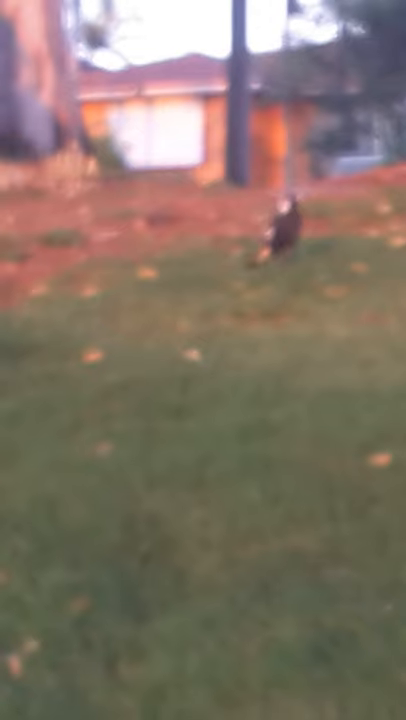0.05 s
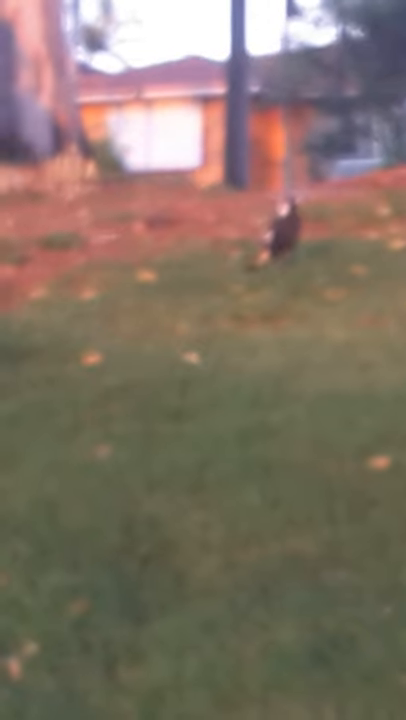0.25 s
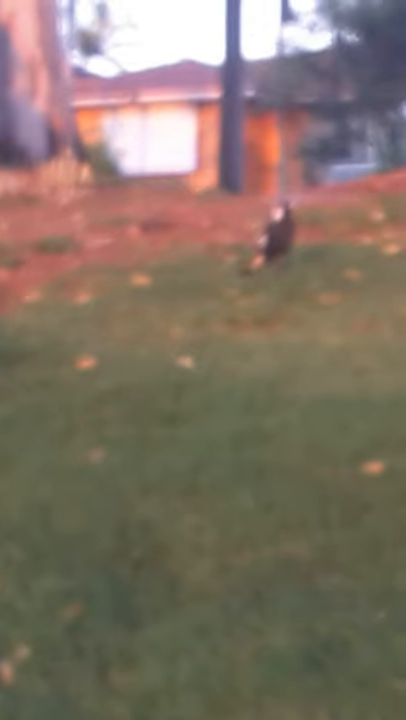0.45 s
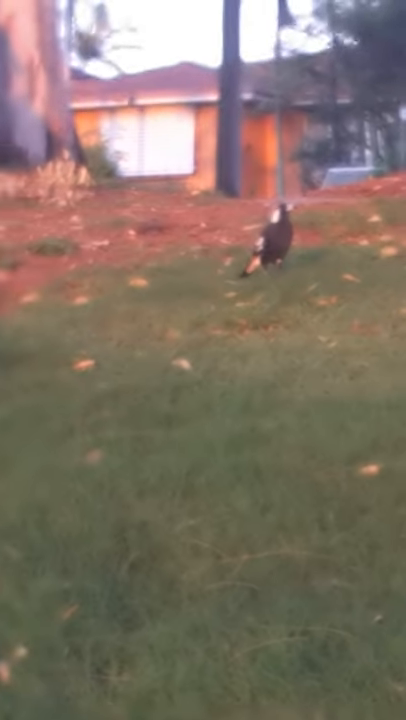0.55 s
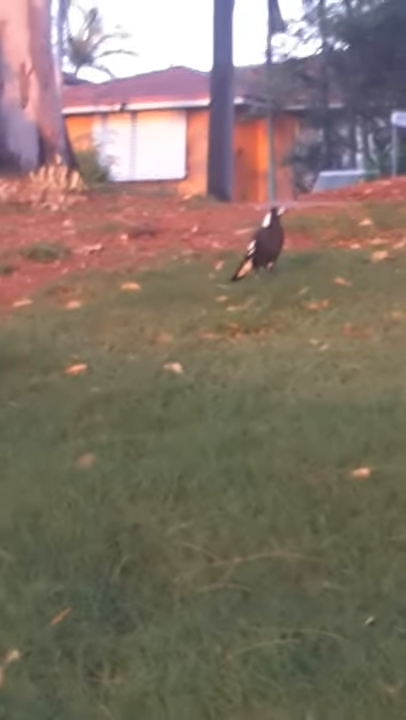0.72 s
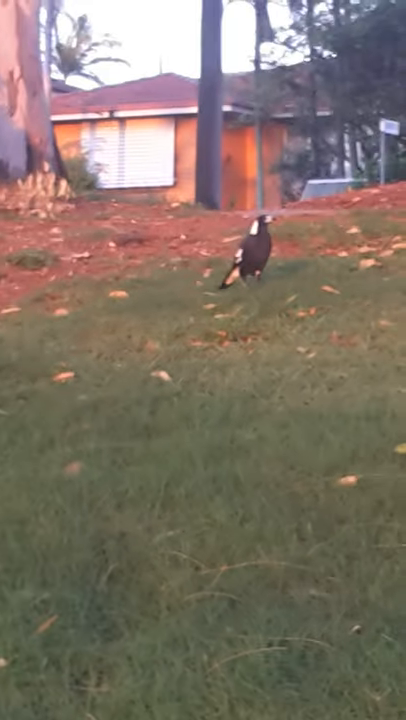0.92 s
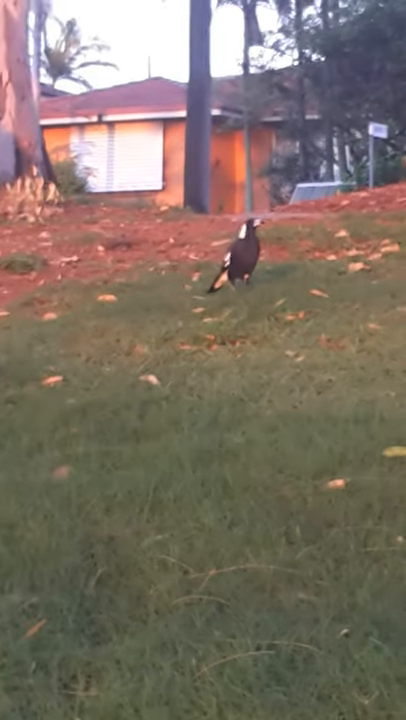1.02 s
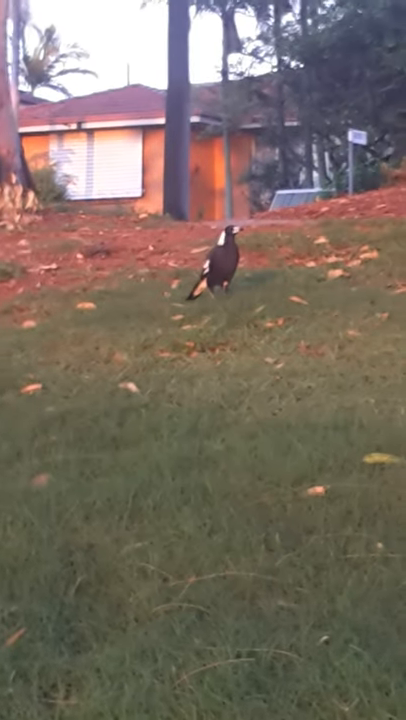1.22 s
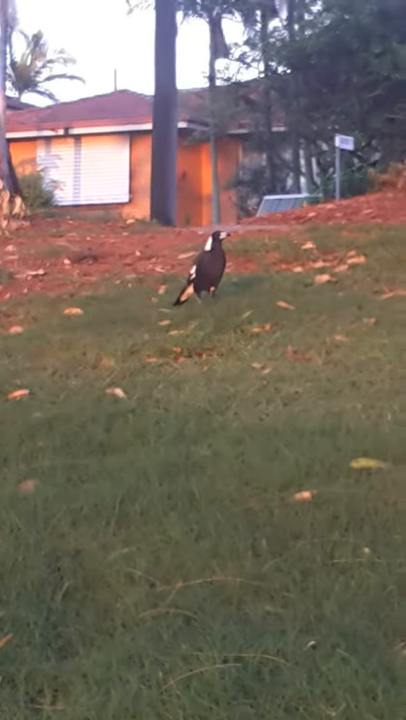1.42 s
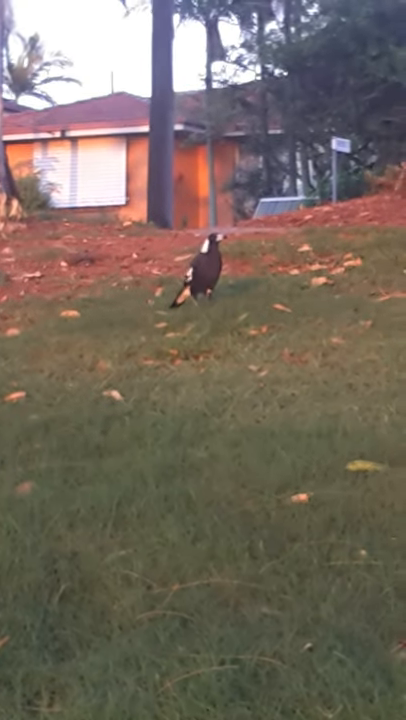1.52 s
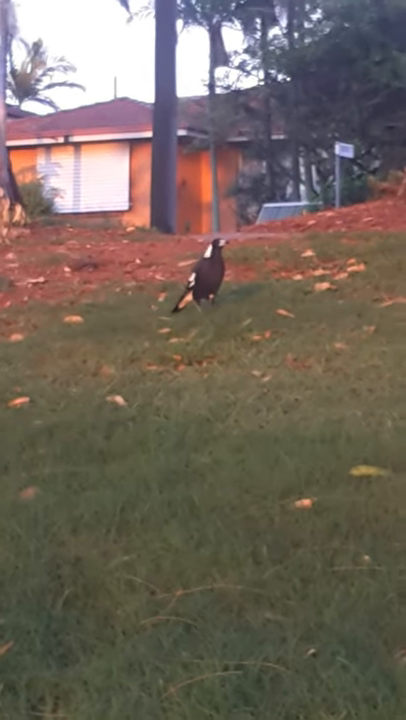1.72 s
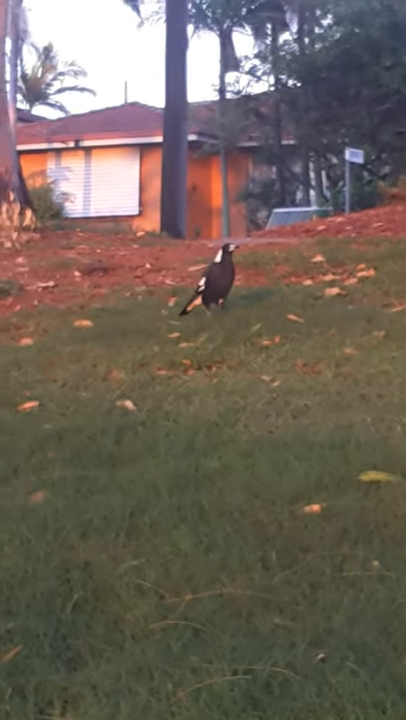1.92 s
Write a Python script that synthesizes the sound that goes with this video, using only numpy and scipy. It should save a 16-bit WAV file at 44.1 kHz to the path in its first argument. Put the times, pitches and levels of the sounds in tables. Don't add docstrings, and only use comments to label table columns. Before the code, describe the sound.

A magpie on a suburban lawn: faint rasp from 0.2 s, low gurgled notes with squeaks at 0.42-0.6 s, then a pause. Near 1.45 s tiny peeps lead to a loud rising whistle, peaking at 1.58 s, and a rapid falling trill until 1.64 s. Far chirps at 0.6, 1.2 and 1.83 s; light house echo. Distant traffic, early leaf hiss, scattered dry ticks, very high insect buzz after 1 s.

```python
import sys
import numpy as np
from scipy import signal
from scipy.fft import rfft, irfft
from scipy.io import wavfile
from scipy.ndimage import uniform_filter1d

SR = 44100
rng = np.random.default_rng(int(sys.argv[2]) if len(sys.argv) > 2 else 0)


def nominal_scale(level):
    x = np.asarray(level, float) / 20
    return 10 ** x


def master(y):
    cut = np.clip(np.atleast_2d(y).T, -1, 1)
    pcm = np.round(cut * 32767)
    wavfile.write(sys.argv[1], SR, pcm.astype(np.int16))


N = 85995
T = np.arange(N) / SR

# (time [s], length [s], start pitch [Hz], end pitch [Hz], level [dB])
GURGLES = [
    (.451, .009, 1145, 1130, -48),
    (.463, .031, 1310, 1275, -46),
    (.503, .04, 1235, 1195, -43),
    (.556, .036, 1098, 1090, -46),
]
# (frequency [Hz], level [dB])
GURGLE_THROAT = [(1200, -3), (2400, -17), (3700, -5), (4900, -3), (6100, -7), (7400, -7), (8700, -13),
                 (11000, -22)]
# (time [s], pitch [Hz], level [dB])
RASP = [
    (.2, 1333, -65),
    (.233, 1325, -65),
    (.24, 1333, -56.5),
    (.28, 1344, -55),
    (.325, 1330, -53.5),
    (.345, 1348, -62.5),
    (.41, 1380, -65.5),
]
# (frequency [Hz], level [dB])
RASP_THROAT = [(1330, -18), (2100, -16), (2750, -4), (4000, -2), (5300, -5), (6700, -10), (8000, -12),
               (9500, -30)]
# (time [s], frequency [Hz])
BEAK = [
    (.24, 5300),
    (.27, 5300),
    (.29, 4000),
    (.42, 4000),
    (.47, 5150),
    (.495, 5100),
    (.51, 6100),
    (.545, 5900),
    (.57, 4600),
]
# (time [s], length [s], pitch [Hz], level [dB], octave level [dB])
SQUEAKS = [
    (.298, .008, 3715, -64, 8),
    (.417, .02, 3740, -50, -5),
    (.439, .018, 3420, -50, 6),
    (.494, .008, 3355, -49, 9),
    (.5445, .0065, 3680, -47, 13),
]
# (time [s], length [s], start pitch [Hz], end pitch [Hz], level [dB])
PEEPS = [
    (.188, .032, 1410, 1400, -65),
    (1.453, .014, 3300, 3500, -62),
    (1.464, .008, 4900, 5000, -61),
    (1.513, .01, 4850, 5000, -63),
]
# (time [s], pitch [Hz], level [dB])
LEAD = [
    (1.462, 2400, -68),
    (1.473, 2750, -59),
    (1.477, 3750, -54),
    (1.482, 3500, -59),
    (1.487, 2900, -51),
    (1.494, 2650, -56),
    (1.51, 2500, -56),
    (1.521, 2400, -56),
    (1.523, 2400, -70),
]
# (time [s], pitch [Hz], level [dB])
WHISTLE = [
    (1.5225, 2700, -56),
    (1.526, 4150, -46),
    (1.537, 4450, -40),
    (1.543, 4620, -50),
    (1.55, 4920, -41),
    (1.56, 5100, -43),
    (1.568, 5150, -37),
    (1.586, 5090, -36),
    (1.59, 5060, -60),
]
# (time [s], length [s], start pitch [Hz], flick-up pitch [Hz], level [dB])
TRILL = [
    (1.589, .011, 3800, 4480, -43),
    (1.6, .011, 3650, 4450, -41.5),
    (1.611, .012, 3550, 4400, -41),
    (1.623, .012, 3150, 4200, -43),
    (1.635, .008, 2900, 3950, -46),
]
# (time [s], level [dB])
CHIRPS = [
    (.613, -56),
    (1.21, -57),
    (1.834, -56.5),
]
# (time from start [s], pitch [Hz], level [dB])
CHIRP = [
    (0, 2300, -10),
    (.004, 2350, -4),
    (.018, 2620, 2),
    (.022, 2950, -9),
    (.029, 3400, 0),
    (.036, 3650, -12),
]
# (time [s], length [s], level [dB])
BUZZ = [(1.021, .03, -67), (1.081, .06, -64), (1.151, .037, -64), (1.212, .089, -63.5),
        (1.311, .041, -63.5), (1.361, .08, -63), (1.451, .249, -62.5), (1.712, .058, -63),
        (1.781, .08, -62.5), (1.871, .04, -63), (1.921, .01, -62), (1.94, .03, -62.5)]
# (time [s], level [dB])
TICKS = [
    (.105, -48),
    (.623, -53),
    (.975, -42),
    (1.0135, -48),
    (1.0585, -46),
    (1.228, -50),
    (1.232, -50),
    (1.729, -46),
]
# (frequency [Hz], density [dB per Hz])
TOWN = [(82, -24), (140, -8), (183, 1), (216, -2), (300, -3.5), (349, -6), (515, -7.5), (4370, -14),
        (5000, -22.5), (6500, -46), (11000, -120)]
# (time [s], level [dB])
SWELL = [
    (.018, -64),
    (.2, -60.5),
    (.5, -57.5),
    (.8, -57),
    (1.0, -56),
    (1.2, -58),
    (1.5, -57),
    (1.95, -62),
]
# (frequency [Hz], density [dB per Hz])
RUMBLE = [(15, -48), (25, -13), (27, -33), (32, -21), (81, 3), (119, 4), (170, -6), (220, -44), (370, -120)]
# (frequency [Hz], density [dB per Hz])
LEAVES = [(1760, -47), (3000, -20), (4090, -40), (4660, 1.5), (6260, -9), (7030, -3), (9580, -23.5),
          (11900, -8.5), (15500, -18)]
# (time [s], level [dB])
GUST = [
    (.018, -72),
    (.2, -64.5),
    (.7, -61.5),
    (.95, -64),
    (1.05, -74),
    (1.95, -77),
]
# (frequency [Hz], density [dB per Hz])
HISS = [(2940, -33), (5000, -15), (5240, -5), (6850, -3.5), (8440, -14), (15600, -12.5)]

GURGLE_ROUGH, SQUEAK_ROUGH, RASP_ROUGH = .27, .2, .5
RASP_AIR_DB, GURGLE_AIR_DB = -1.5, -8
BEAK_DB, BEAK_WIDE_HZ = 8, 500
EDGE_S = .0015
FLICK_S, TRILL_SAG_HZ_PER_S = .0028, 22000
TRILL_RING_HZ, TRILL_RING_WIDE_HZ = 4250, 1100
WOBBLE_DB, DRIFT_DB = 1.2, 3
BUZZ_HZ, BUZZ_START_HZ, BUZZ_SAG_S = 12600, 14400, .27
BUZZ_RING_HZ, BUZZ_RING_DB = 330, 0
BUZZ_RATE_HZ, BUZZ_SCATTER_DB = 110, 1.5
STROKE_S, STROKE_ON = .0102, .8
ECHO_T60_S, ECHO_DB = .75, -10
EARLY_T60_S, EARLY_DB = .12, -5.5
SLAP_S, SLAP_T60_S, SLAP_DB = .068, .04, -17


def bird():
    call = rough_call()
    peeps = voice(notes(PEEPS), [(1, 0.0041)])
    lead = voice(curve(LEAD), [(1, 0.0064), (2, -20)], 2 * SQUEAK_ROUGH)
    whistle = voice(curve(WHISTLE), [(1, 0.012), (2, -17)])
    return call + peeps + lead + whistle + trill()


def rough_call():
    low, rasp = notes(GURGLES), curve(RASP)
    breath = noise(RASP_THROAT, flicker_db=2.5)
    rasp_air = nominal_scale(RASP_AIR_DB) * rasp[1] * breath
    gurgle_air = nominal_scale(GURGLE_AIR_DB) * low[1] * unit(band(breath, 6000, 4200))
    squeaks = np.zeros(N)
    for t0, length, hz, db, octave_db in SQUEAKS:
        orders = [(1, 0), (2, octave_db), (3, octave_db - 21)]
        squeaks += voice(notes([(t0, length, hz, hz, db)]), orders, SQUEAK_ROUGH)
    gurgles = voice(low, stack(low, GURGLE_THROAT), GURGLE_ROUGH)
    rasps = voice(rasp, stack(rasp, RASP_THROAT), RASP_ROUGH)
    return gurgles + rasps + rasp_air + gurgle_air + squeaks


def trill():
    track = notes(TRILL, flick=True)
    ring_db = -6 * ((track[0] - TRILL_RING_HZ) / TRILL_RING_WIDE_HZ * 2) ** 2
    return voice(track, [(1, ring_db), (2, -7)], SQUEAK_ROUGH)


def voice(track, orders, rough=0.):
    hz, gain = track
    phase = 2 * np.pi * np.cumsum(hz * (1 + 0.023 * rough * walk(400))) / SR
    total = np.zeros(N)
    for k, db in orders:
        r = rough * min(k / 4, 1.5)
        shake = nominal_scale((WOBBLE_DB + DRIFT_DB * r) * walk(90)) * (1 + r * walk(500))
        total += nominal_scale(db) * shake * np.sin(k * phase + k * k)
    return np.sqrt(2) * gain * total


def stack(track, throat):
    beak_hz = np.interp(T, *np.array(BEAK).T)
    levels = []
    for k in range(1, 11):
        hz = k * track[0]
        lift = BEAK_DB * np.exp(-.5 * ((hz - beak_hz) / BEAK_WIDE_HZ) ** 2)
        levels.append(colour(throat, hz) + lift)
    total = 10 * np.log10(sum(nominal_scale(db) ** 2 for db in levels))
    return [(k, db - total) for k, db in enumerate(levels, 1)]


def far_bird():
    return sum(voice(curve(CHIRP, t0, db), [(0.99, 0.0084)]) for t0, db in CHIRPS)


def houses(x):
    def tail(t60):
        return unit(rng.standard_normal(N) * 1000. ** (-T / t60)) / np.sqrt(N)

    diffuse = nominal_scale(ECHO_DB) * band(tail(ECHO_T60_S), 4900, 5600)
    scatter = nominal_scale(EARLY_DB) * band(tail(EARLY_T60_S), 4500, 9000)
    slap = nominal_scale(SLAP_DB) * np.roll(tail(SLAP_T60_S), int(SLAP_S * SR))
    return x + signal.fftconvolve(x, diffuse + scatter + slap)[:N]


def insect():
    hz = BUZZ_HZ + (BUZZ_START_HZ - BUZZ_HZ) * np.exp(-np.maximum(T - BUZZ[0][0], 0) / BUZZ_SAG_S)
    ring = np.sqrt(2) * np.sin(2 * np.pi * np.cumsum(hz + BUZZ_RING_HZ * walk(2500)) / SR)
    scrape = unit(band(rng.standard_normal(N), BUZZ_HZ - 100, 2900))
    bursts = np.zeros(N)
    for t0, length, db in BUZZ:
        strokes = uniform_filter1d(1. * ((T - t0) / STROKE_S % 1 < STROKE_ON), size=30)
        bursts += nominal_scale(db) * gate(t0, length) * strokes
    return unit(nominal_scale(BUZZ_RING_DB) * ring + scrape) * nominal_scale(BUZZ_SCATTER_DB * walk(BUZZ_RATE_HZ)) * bursts


def ticks():
    x = np.zeros(N)
    for t0, db in TICKS:
        x[int(t0 * SR)] = nominal_scale(db)
    x = band(x, 11100, 7800)
    return x * nominal_scale(max(db for _, db in TICKS)) / np.abs(x).max()


def traffic():
    rumble = nominal_scale(-60.5) * noise(RUMBLE, flicker_db=1.0)
    hum = noise(TOWN, flicker_db=2.0) * swell(SWELL)
    return rumble + hum


def leaves():
    return noise(LEAVES, flicker_db=5.0) * swell(GUST)


def microphone_hiss():
    return nominal_scale(-70) * noise(HISS, flicker_db=1.2)


def noise(table, flicker_db):
    f = np.arange(1, N // 2 + 2) * SR / N
    shaped = irfft(rfft(rng.standard_normal(N)) * nominal_scale(colour(table, f)), N)
    centres = 30 * 2 ** np.arange(0, 9.6, .5)
    return unit(sum(band(shaped, hz, hz * 0.41) * nominal_scale(flicker_db * walk(12.24)) for hz in centres))


def swell(rows):
    return nominal_scale(np.interp(T, *np.array(rows).T))


def curve(rows, t0=0, db=0):
    s, hz, level = np.array(rows, float).T
    return np.interp(T - t0, s, hz), nominal_scale(np.interp(T - t0, s, level, -200, -200) + db)


def notes(rows, flick=False):
    hz, gain = np.full(N, 1000.), np.zeros(N)
    for t0, length, hz0, hz1, db in rows:
        t = np.clip(T - t0, 0, length)
        glide = 1 - np.exp(-t / FLICK_S) if flick else t / length
        sag = flick * TRILL_SAG_HZ_PER_S * t
        hz = np.where(T >= t0, hz0 + (hz1 - hz0) * glide - sag, hz)
        gain = gain + nominal_scale(db) * gate(t0, length)
    return hz, gain


def gate(t0, length):
    return np.sin(np.pi / 2 * np.clip(np.minimum(T - t0, t0 + length - T) / EDGE_S, 0, 1)) ** 2


def walk(rate):
    k = int(SR / rate)
    steps = np.repeat(rng.standard_normal(N // k + 1), k)
    w = uniform_filter1d(uniform_filter1d(steps, k), k)[:N]
    return w / w.std()


def colour(table, hz):
    f, db = np.array(table, float).T
    return np.interp(np.log(hz), np.log(f), db)


def band(x, hz, width_hz):
    f = np.arange(N // 2 + 1) * SR / N
    return irfft(rfft(x) * np.exp(-.5 * ((f - hz) / width_hz * 2) ** 2), N)


def unit(x):
    return x / np.sqrt(np.mean(x ** 2))


def scene():
    background = microphone_hiss() + traffic() + leaves()
    birds = houses(bird() + far_bird())
    return (birds + insect() + ticks() + background)[None]


def low_pass(x):
    return signal.sosfilt(signal.butter(12, 15750, fs=SR, output="sos"), x)


def record(dry):
    start_s = 0.019
    mix = dry * (T >= start_s) - .0005
    return low_pass(mix)


dry = scene()
out = record(dry)
master(out)
```